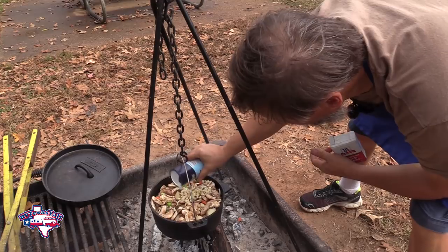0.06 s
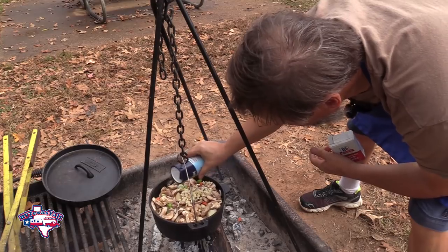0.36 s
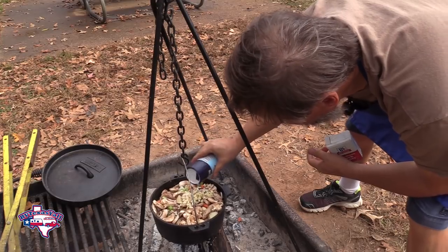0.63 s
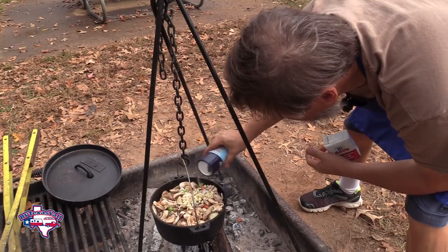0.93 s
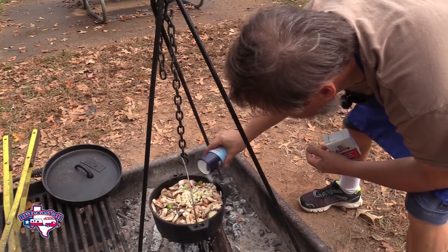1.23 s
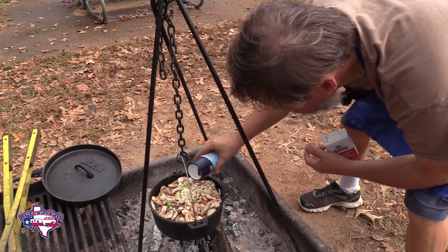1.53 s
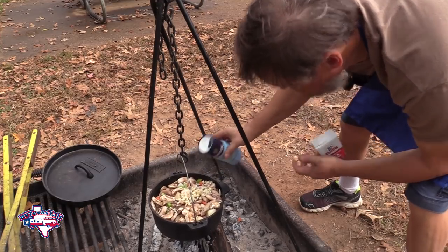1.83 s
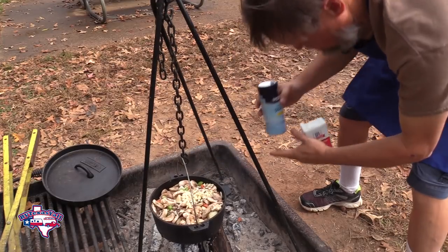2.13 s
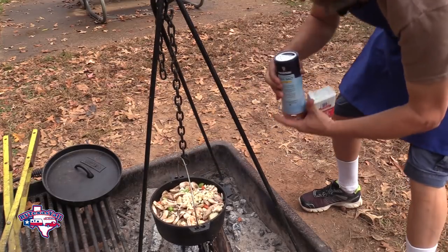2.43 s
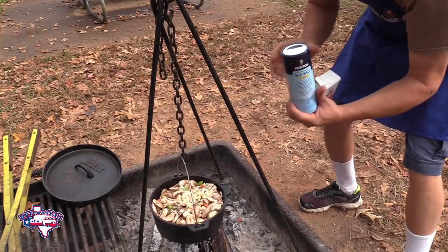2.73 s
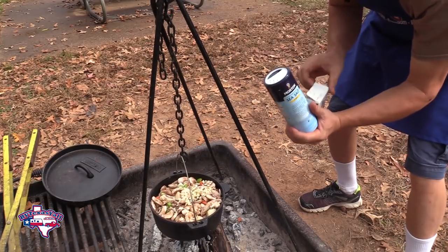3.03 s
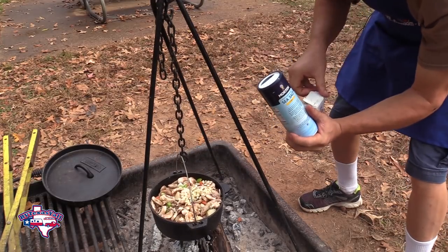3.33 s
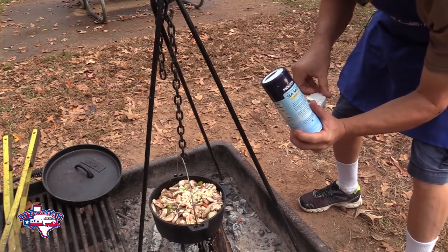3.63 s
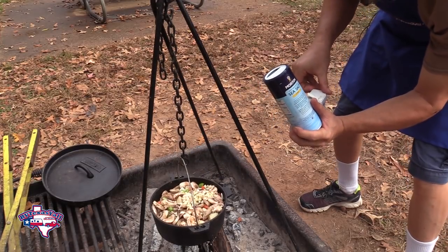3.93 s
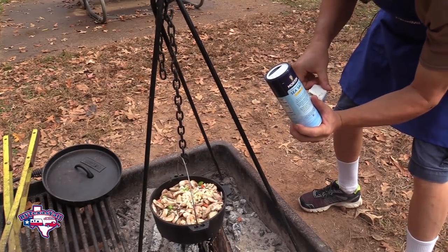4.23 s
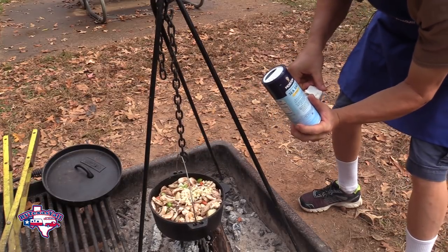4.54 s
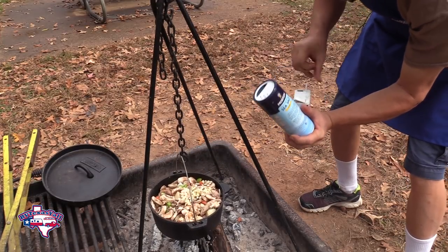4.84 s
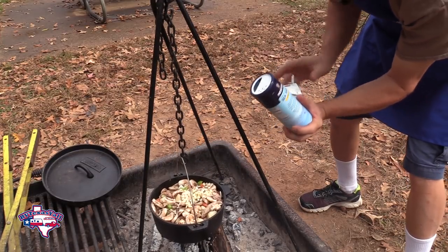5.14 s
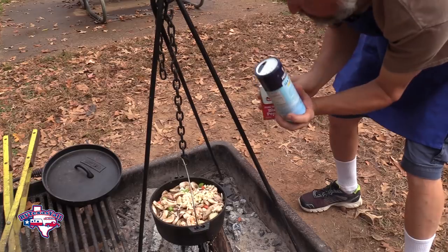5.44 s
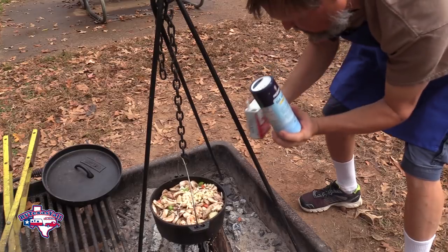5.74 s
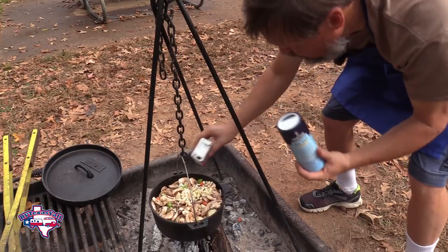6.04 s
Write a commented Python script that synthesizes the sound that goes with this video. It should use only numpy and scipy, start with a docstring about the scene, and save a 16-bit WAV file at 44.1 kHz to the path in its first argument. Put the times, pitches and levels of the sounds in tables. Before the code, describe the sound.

A low hum of distant traffic and a soft hiss run throughout this outdoor scene. For the first two seconds, salt is shaken from a canister into a pot in quick, uneven, hissy bursts, about five a second. Just after 2 seconds the salt swishes back down inside the canister. At 2.6 seconds a spice tin knocks against it, and a shoe briefly scuffs dry ground. From about 3 to 4.4 seconds, close to the microphone, hands rub softly, fingernails tick and the tin's lid gives small clacks, while a few faint, distant birds begin to call. At 4.7 seconds the lid snaps open with a sharp crack and a very short metallic ring, the loudest sound, followed by a small clack. The containers touch lightly again around 5.4 seconds, and spice slides faintly inside the tin until near 6 seconds.

```python
"""Outdoors: the near (left) microphone is by the hands, the far (right) one a metre further off.
Over distant traffic, salt is shaken from a canister into a pot for two seconds, then slides back as
the canister is righted. At 2.6 s a spice tin knocks against it and a shoe scuffs. Fingers pick at the
tin's lid while a few birds begin to call; at 4.7 s the lid snaps open and the tin rings. The two
containers touch again, and the spice slides as the tin is tipped."""
import sys
import numpy as np
from scipy import signal
from scipy.fft import rfft, irfft
from scipy.io import wavfile

SR = 44100
rng = np.random.default_rng(int(sys.argv[2]) if len(sys.argv) > 2 else 0)


def dump_mix(stems):
    """Bounce the given channels to the path in sys.argv[1] as a 16-bit WAV at rate SR."""
    frames = np.atleast_2d(stems).T  # one column per channel
    limited = np.clip(frames, -1, 1)  # hard clip at full scale
    pcm = np.round(limited * 32767).astype(np.int16)
    wavfile.write(sys.argv[1], SR, pcm)


N = 267995
TIME = np.arange(N) / SR
AGE = TIME[:SR // 2]   # seconds since a blow


def from_db(db):
    """Decibels to gain."""
    return 10 ** (np.asarray(db) / 20)


def mic_gains(near_db, far_db):
    """One gain for each microphone."""
    return from_db([[near_db], [far_db]])


def swell(peak_s, length_s):
    """A smooth rise and fall; the length is taken at half height."""
    return np.exp(-np.log(2) * (2 * (TIME - peak_s) / length_s) ** 2)


def dying(t60):
    """Exponential decay after a blow: 60 dB in t60 seconds."""
    return from_db(-60 * AGE / t60)


def coloured(noise, spectrum):
    """Gives each microphone's noise its own spectrum, rolling off below the first row."""
    hz, *mics_db = np.transpose(spectrum)
    log_hz = np.log(np.fft.rfftfreq(noise.shape[1], 1 / SR) + 1)
    gains = from_db([np.interp(log_hz, np.log(hz), db) for db in mics_db])
    skirt = np.minimum(1, np.exp(log_hz) / hz[0]) ** 2
    return irfft(rfft(noise) * gains * skirt, noise.shape[1])


def grains(spectrum, per_s, spread_db):
    """Countless tiny impacts of uneven size; rms 1 in the louder microphone."""
    sizes = from_db(spread_db * np.minimum(rng.exponential(1, (2, N)), 4))
    impacts = sizes * rng.standard_normal((2, N)) * (rng.random((2, N)) < per_s / SR)
    hiss = coloured(impacts, spectrum)
    return hiss / hiss.std(axis=1).max()


def unit_blow(x):
    """Scales each channel to the energy of five milliseconds at rms 1."""
    return x / np.sqrt(np.sum(x ** 2, axis=1, keepdims=True) / (SR / 200))


def burst(low_hz, high_hz, t60):
    """A short dying noise in one band."""
    band = signal.butter(2, [low_hz, min(high_hz, .45 * SR)], "band", fs=SR, output="sos")
    noise = rng.standard_normal((2, len(AGE))) * dying(t60)
    return unit_blow(signal.sosfilt(band, noise + 1e-18))


def ring(modes):
    """Damped sines, each reaching the two microphones differently; a small body gives off no bass."""
    out = 0
    for hz, near_db, far_db, t60 in modes:
        gains = mic_gains(near_db, far_db) * from_db(rng.uniform(-0.85, 1))   # no two blows are alike
        radiation = signal.butter(1, hz / 2, "high", fs=SR)
        mode = gains * np.sin(2 * np.pi * hz * AGE) * dying(t60)
        out = out + signal.lfilter(*radiation, mode + 1e-18)
    return out


def add(out, start_s, blow, far_lag_s=.00285):
    """Places a blow in time; it crosses the extra metre to the far microphone a little later."""
    for mic, lag_s in enumerate((0, far_lag_s)):
        start = round((start_s + lag_s) * SR)
        out[mic, start:start + len(AGE)] += blow[mic, :N - start]


# the open air around the microphones: freq_hz, near_db_per_hz, far_db_per_hz
TRAFFIC_SPECTRUM = [(25.3, -102, -82), (48.3, -88, -78), (80.3, -75.5, -69), (129.8, -79.5, -73),
                    (241, -88, -85.5), (408, -95.5, -84), (716, -95.5, -87.5), (957, -99, -88.5),
                    (1436, -104.3, -96.5), (2590, -105.1, -101.8), (4400, -110.5, -103.5),
                    (8040, -112, -105.3), (11500, -114.5, -111.5), (14400, -117, -114.5)]

def traffic(bass_share=0.66):
    """Distant traffic hums under a soft hiss; the microphones share part of the bass."""
    own, common = rfft(rng.standard_normal((2, N))), rfft(rng.standard_normal(N))
    shared = bass_share * (np.fft.rfftfreq(N, 1 / SR) < 120)
    noise = irfft(np.sqrt(1 - shared) * own + np.sqrt(shared) * common, N)
    return coloured(noise, TRAFFIC_SPECTRUM) * np.sqrt(SR / 2)


# far off, a whine, a low hum, then bird calls: peak_s, length_s, pitch_hz, level_db
DISTANT_TONES = [(0.61, 0.97, 546, -68), (3.5, 2.3, 165, -67), (3.594, 0.26, 3020, -68),
                 (3.65, .14, 4630, -69), (4.33, 0.11, 6930, -72), (5.033, 0.067, 5700, -71),
                 (5.644, .07, 5600, -72), (5.844, 0.017, 7360, -65)]

def birds_and_hums(blur=0.026):
    """Distance blurs each tone into a narrow, wavering band."""
    out = 0
    for peak_s, length_s, hz, db in DISTANT_TONES:
        lowpass = signal.butter(2, hz * blur, fs=SR, output="sos")
        waver = signal.sosfilt(lowpass, rng.standard_normal((2, N)))
        tone = np.sqrt(2) * np.sin(2 * np.pi * hz * TIME)
        out = out + from_db(db) * swell(peak_s, length_s) * waver / waver.std() * tone
    return out


def surroundings(hits, t60=0.34, tail_db=-29, echo_s=0.012, echo_db=-30):
    """Ground and trees scatter back a faint tail, and something nearby gives one smeared echo."""
    tail = rng.standard_normal((2, len(AGE))) * dying(t60) * (AGE > .006)
    echo = rng.standard_normal((2, len(AGE))) * np.exp(-np.abs(AGE - echo_s) / 0.011)
    response = sum(from_db(db) * part / np.linalg.norm(part[0])
                   for db, part in [(tail_db, tail), (echo_db, echo)])
    return signal.fftconvolve(hits, response, axes=1)[:, :N]


# dry ground underfoot, louder at the far microphone: freq_hz, near_db, far_db
GROUND_SPECTRUM = [(250, 11, 10), (900, 10, 15), (1330, 3, 5), (1860, 0, 17.5), (2760, 3, 3), (4500, -4, 2),
                   (10000, -5, 3.5), (16000, -18, -7)]

def shoe(length_s=0.036):
    """A shoe scuffs the ground in two quick scrapes."""
    scuffs = from_db(-53) * swell(2.804, length_s) + from_db(-46) * swell(2.845, length_s)
    return scuffs * grains(GROUND_SPECTRUM, per_s=9000, spread_db=1.2)


# shifts of grip by the near microphone: peak_s, length_s, rub_db, hiss_db
GRIP_SHIFTS = [(2.494, 0.16, -68, -69), (2.803, 0.34, -59, -72), (3.124, 0.06, -73, -68),
               (3.315, 0.18, -73, -74), (3.813, 0.48, -57.5, -75), (5.18, 0.044, -75, -70),
               (5.495, 0.22, -61.5, -78), (6.0, .3, -66.5, -71)]
# hiss of skin on the containers: freq_hz, near_db, far_db
SKIN_SPECTRUM = [(1500, -7.5, -6), (3770, -6, -1), (9300, -6.5, -5), (16000, -11, -11)]

def hands(skin_db=-67, still_s=4.17, fade_s=1.4):
    """Skin hisses on the canister until it is held still; each new grip adds hiss and a low rub."""
    rubbing, hissing = sum(from_db([[rub_db], [hiss_db]]) * swell(peak_s, length_s)
                           for peak_s, length_s, rub_db, hiss_db in GRIP_SHIFTS)
    holding = from_db(skin_db) * np.clip((still_s - TIME) / fade_s, 0, 1)
    hiss = (hissing + holding) * grains(SKIN_SPECTRUM, per_s=6000, spread_db=3.5)
    rub_spectrum = [(237, 0, -27), (343, 10.5, 4), (584, -10, -3), (1480, -12, -44), (5000, -27, -36)]
    return hiss + rubbing * grains(rub_spectrum, per_s=1500, spread_db=2.5)


# spice shifting in the open tin: peak_s, level_db, length_s
SPICE_MOVES = [(4.743, -50, 0.02), (4.81, -62, 0.13), (5.51, -59, 0.029), (5.569, -53, 0.05),
               (5.691, -60.5, 0.092)]
# its fine hiss: freq_hz, near_db, far_db
SPICE_SPECTRUM = [(2520, -9, -18), (4500, 0, -7), (8100, 0, 0), (10800, 6, 4), (14000, 1.5, -6),
                  (16000, -7, -8)]

def spice():
    """Fine grains slide along the tin in short runs."""
    sliding = sum(from_db(db) * swell(peak_s, length_s) for peak_s, db, length_s in SPICE_MOVES)
    return sliding * grains(SPICE_SPECTRUM, per_s=28000, spread_db=3.5)


# shakes over the pot, levels before the gush trim: peak_s, throw_db, backswing_db
SALT_SHAKES = [(0.149, -47.5, -50), (0.339, -47, -53.5), (0.569, -61, -63), (0.748, -52, -57.5),
               (0.923, -47.5, -52), (1.121, -60, -61.5), (1.296, -49, -56), (1.522, -49, -69),
               (1.775, -51.5, -59), (1.952, -61, -89)]
# salt pouring into the pot: freq_hz, near_db, far_db
POUR_SPECTRUM = [(1160, -11.5, -4), (2220, -10.5, -7.5), (3460, -1.5, -3), (5800, -4.5, -3),
                 (8350, 1, -3.5), (10500, 1, -4.5), (13100, -4.5, -11), (16200, -7.5, -19)]

def salt_pour(gush_s=0.05, backswing_s=.088, rebound_s=0.098, rebound_db=-10.5, trim_db=-2.5):
    """Each shake gives three gushes: backswing, throw and rebound; a thin trickle runs between them."""
    gushes = 0
    for peak_s, throw_db, backswing_db in SALT_SHAKES:
        gushes += from_db(backswing_db) * swell(peak_s - backswing_s, gush_s)
        gushes += from_db(throw_db) * swell(peak_s, gush_s)
        gushes += from_db(throw_db + rebound_db) * swell(peak_s + rebound_s, gush_s)
    trickle = mic_gains(-68, -63) * np.clip((2.4 - TIME) / 0.76, 0, 1)
    flow = np.hypot(from_db(trim_db) * gushes, trickle)
    return flow * grains(POUR_SPECTRUM, per_s=11000, spread_db=1.5)


# salt on the canister's wall: freq_hz, near_db, far_db
SLIDE_SPECTRUM = [(1500, -23, -30), (2500, -11.5, -11), (4520, -5.5, -15), (7800, .5, -6.5), (10900, 2, -9),
                  (13100, -4, -12), (16000, -9, -18)]

def salt_slide(peak_s=2.144, peak_db=-38.5, rise_s=0.17, fall_s=0.089):
    """Salt gathers speed down the righted canister, then comes to rest."""
    drop_db = 20 * np.maximum((peak_s - TIME) / rise_s, (TIME - peak_s) / fall_s)
    onset = np.clip((TIME - 2.0) / 0.04, 0, 1)
    return from_db(peak_db - drop_db) * onset * grains(SLIDE_SPECTRUM, per_s=24000, spread_db=1.3)


# nails on the rim: start_s, near_db, centre_hz, width_octaves, far_offset_db
RIM_TICKS = [(2.452, -51, 10100, .53, -11), (3.252, -64, 10200, 1.1, -5), (3.554, -59.5, 8200, 1.6, 4),
             (3.656, -44.5, 9800, 2.6, -1), (3.686, -57, 8300, 1.2, -5), (3.914, -59.5, 12200, .7, -7),
             (3.959, -58, 11200, 1.1, -13), (3.9763, -42.5, 11100, 0.36, -17),
             (4.037, -49.5, 8850, 1, -2.5), (4.115, -50, 8600, 2.4, -1.5), (4.3417, -52, 8100, 1.9, -20),
             (4.379, -51.5, 5270, 1.3, -12), (4.8354, -54, 10100, 0.78, -9)]
# clacks of the loose lid: start_s, near_db, far_offset_db
LID_CLACKS = [(2.948, -55, -3), (3.657, -49, -11), (3.6858, -47, -5.5), (3.842, -49.5, -5),
              (4.0373, -53, -9), (4.8305, -45, -8), (4.8357, -41.5, -0.5), (5.355, -70, 2)]
# fingertips landing on the tin's body: start_s, near_db
FINGER_THUDS = [(2.9495, -44.5), (3.6595, -40), (3.694, -46), (3.9155, -50), (4.0392, -34.5), (4.8326, -51)]
# modes of the loose lid and the gripped tin, levels relative: pitch_hz, near_db, far_db, t60_s
LID_MODES = [(790, -2, 1, 0.016), (976, -8, 5, 0.035), (1267, -7, 6, 0.04), (1510, 1, 7, 0.023),
             (1700, -30, -14, 0.027), (2060, -4.5, -6, 0.02), (2280, -2, -38, 0.0067),
             (2840, -16, -14, 0.019)]
HELD_TIN_MODES = [(354, 1, -4, 0.039), (416, 12, -2, 0.041), (470, 0, -2, 0.09), (665, -14.5, -4, 0.11)]

def picking():
    """Fingers work at the tin by the near microphone: nails tick, the lid clacks, fingertips thud."""
    out = np.zeros((2, N))
    for start_s, db, hz, octaves, far_offset_db in RIM_TICKS:
        edge = 2 ** (octaves / 2)
        tick = burst(hz / edge, hz * edge, t60=0.01 / np.sqrt(octaves))   # narrow bands ring longer
        add(out, start_s, mic_gains(db, db + far_offset_db) * tick)
    for start_s, db, far_offset_db in LID_CLACKS:
        clack = unit_blow(ring(LID_MODES)) + from_db(-4.5) * burst(1200, 2400, t60=0.024)
        add(out, start_s, mic_gains(db, db + far_offset_db) * unit_blow(clack))
    for start_s, db in FINGER_THUDS:
        add(out, start_s, mic_gains(db, db - 4) * unit_blow(ring(HELD_TIN_MODES)))
    return out


# the tin's thin walls struck at close range: freq_hz, near_db, far_db
CRACK_SPECTRUM = [(400, -10, -23), (2140, 8, -24), (3260, 1, -9), (6100, -5, -5.5), (7800, 8, -8),
                  (10200, 3.5, -6), (13700, -2, -10), (16000, 5, -15)]

def crack(t60, spike=3.1):
    """A hard contact: one sharp pulse at the near microphone, then bright noise from the walls."""
    push = rng.standard_normal((2, len(AGE))) * dying(t60)
    push[0, 0] = spike
    lead = SR // 100
    return coloured(np.pad(push, ((0, 0), (lead, 0))), CRACK_SPECTRUM)[:, lead - 2:-2]


# modes of tin and canister struck together: pitch_hz, near_db, far_db, t60_s
KNOCK_MODES = [(544, -29.5, -55, 0.048), (597, -23, -60, 0.027), (676, -32, -29, 0.078),
               (820, -24, -23.5, 0.02), (1160, -42, -36.5, 0.031), (1816, -28.5, -48, 0.021),
               (2000, -49, -38, 0.016), (3630, -31.5, -56, 0.016)]
# modes of the tin as its lid lets go: pitch_hz, near_db, far_db, t60_s
SNAP_MODES = [(219, -23.5, -27.5, 0.058), (346, -29.5, -26.5, 0.07), (533, -16, -28, 0.035),
              (640, -25, -30, 0.053), (700, -17.5, -28, 0.052), (800, -32, -23, 0.035),
              (1005, -48, -18.5, 0.026), (1276, -27, -25.5, 0.061), (1383, -32, -26, .06),
              (1680, -47, -36, 0.049), (1990, -29, -39, 0.013), (2250, -27, -39, 0.014),
              (2480, -22.5, -46, 0.018), (2860, -29, -37, 0.023), (3250, -35, -28, 0.027),
              (5070, -27.5, -43, 0.012), (7320, -17, -22, 0.011), (8060, -25, -17, 0.016),
              (10220, -12, -27, 0.013), (12900, -17.5, -24, 0.013)]

def knocks_and_snap():
    """The tin knocks on the canister; later its lid slips and snaps open, setting the walls ringing."""
    out = np.zeros((2, N))
    add(out, 2.5723, ring(KNOCK_MODES) + mic_gains(-30, -32) * crack(t60=0.0095))
    add(out, 2.592, mic_gains(-52, -61) * burst(6000, 14000, t60=0.061))   # a faint bright hiss trails the knock
    add(out, 4.7105, mic_gains(-34, -41) * burst(7000, 18000, t60=0.0082))   # the lid slips
    snap = mic_gains(-11, -13) * crack(t60=0.0043) + mic_gains(-22, -15) * crack(t60=0.026)
    add(out, 4.7121, ring(SNAP_MODES) + snap)
    # the snap's brief midrange ring
    add(out, 4.7128, mic_gains(-26, -44) * burst(1850, 3300, t60=.022))
    add(out, 5.335, mic_gains(-46, -41) * burst(75, 130, t60=.06))   # a dull low bump
    add(out, 5.354, mic_gains(-20, -15) * ring(KNOCK_MODES))   # tin and canister touch again
    return out


def scene():
    """All sources at the two microphones; only the hits echo."""
    hits = picking() + knocks_and_snap()
    nearby = hits + surroundings(hits) + salt_pour() + salt_slide() + spice() + shoe() + hands()
    return nearby + traffic() + birds_and_hums()


def record(dry, cutoff_hz=15900):
    """The recorder rounds the sharpest peak and cuts the top steeply."""
    lowpass = signal.ellip(10, .1, 80, cutoff_hz, fs=SR, output="sos")
    return signal.sosfilt(lowpass, np.tanh(dry))


dry = scene()
out = record(dry)
dump_mix(out)
```